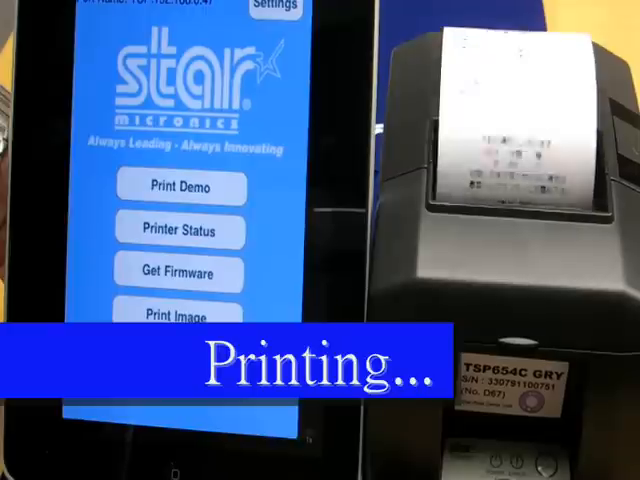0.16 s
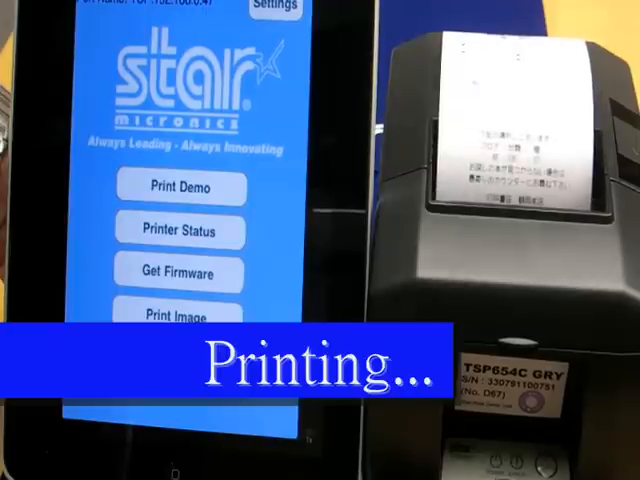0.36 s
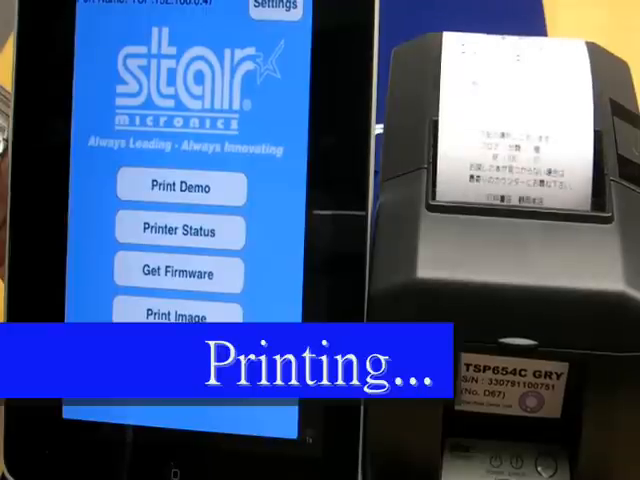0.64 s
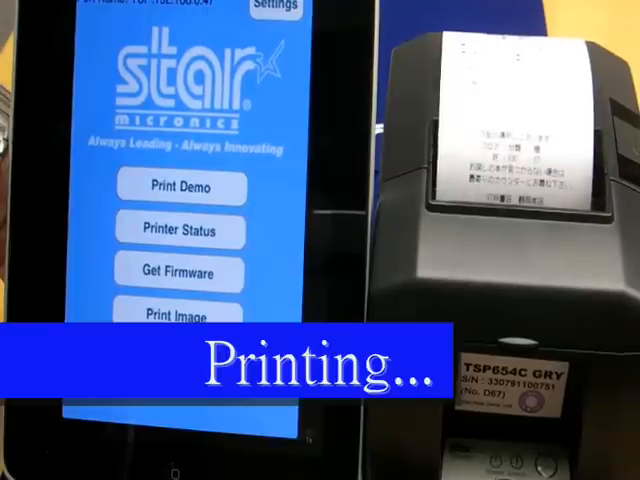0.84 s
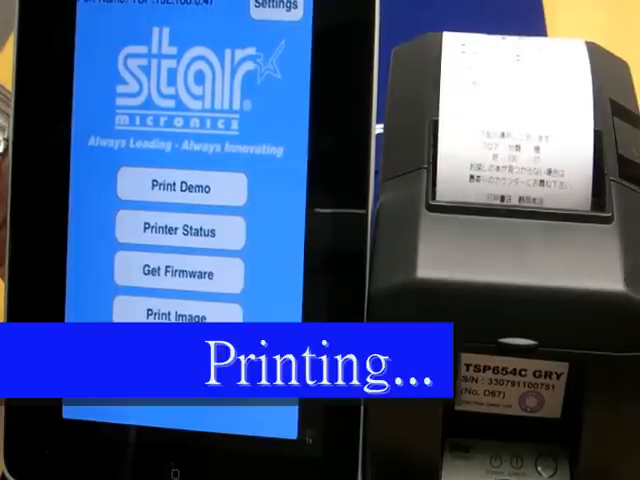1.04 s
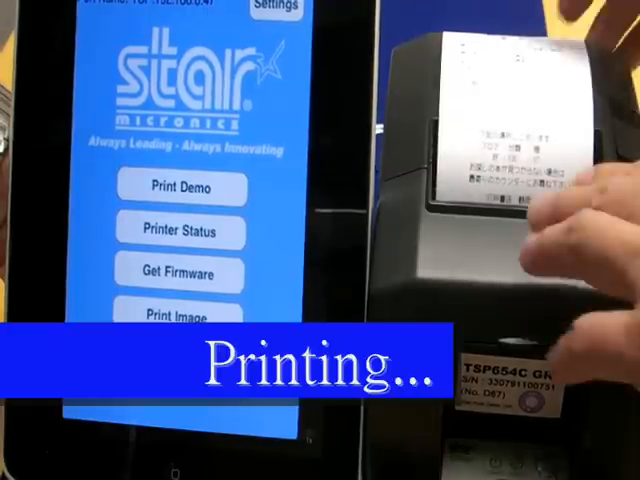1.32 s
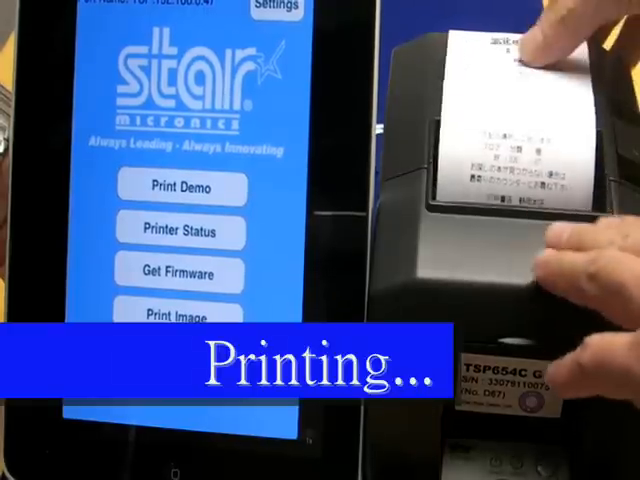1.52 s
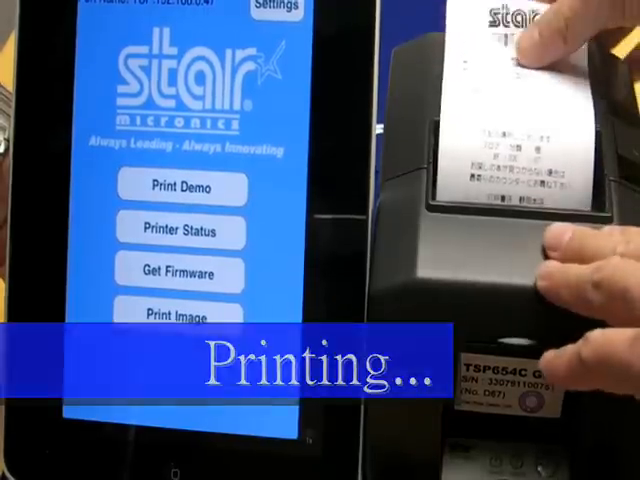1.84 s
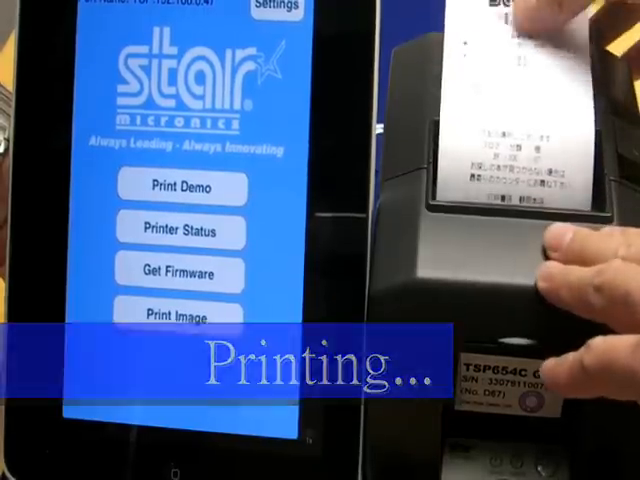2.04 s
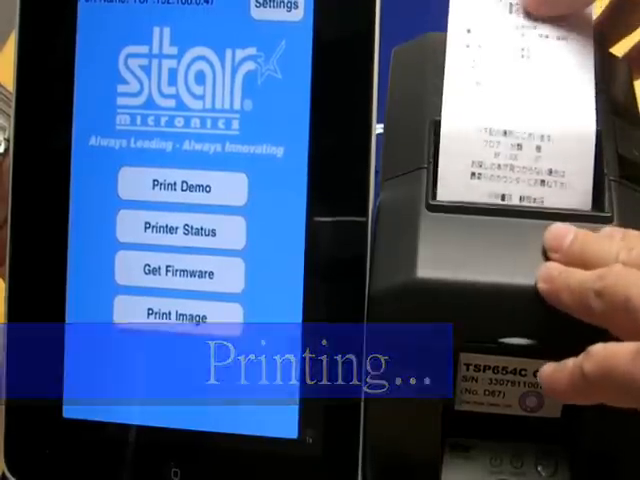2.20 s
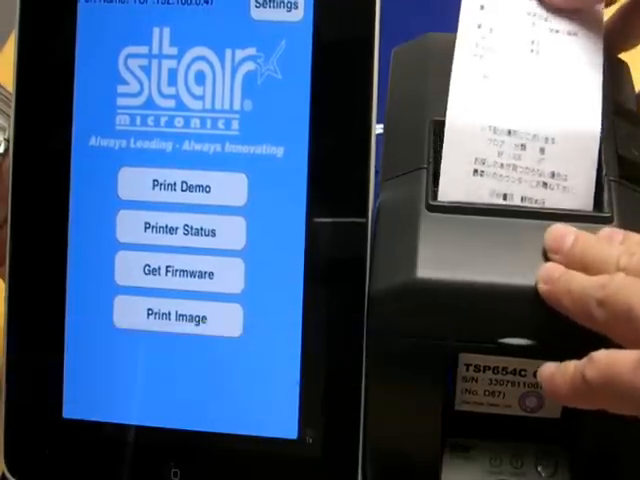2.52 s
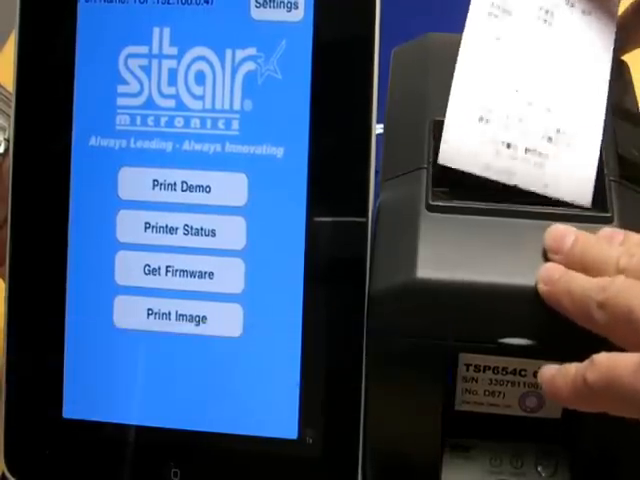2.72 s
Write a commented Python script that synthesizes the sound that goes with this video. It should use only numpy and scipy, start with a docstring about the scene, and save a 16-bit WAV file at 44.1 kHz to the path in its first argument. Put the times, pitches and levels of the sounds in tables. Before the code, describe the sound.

A receipt printer close by whines, rattles and clacks for under half a second; cloth swishes softly, paper crinkles and slides, then tears off with a loud sharp snap in a small quiet room with ventilation.

```python
"""A small receipt printer, close by, ends its job: the motor whines, gears rattle and the cutter clacks.
A sleeve swishes as hands reach in and take the slip; it slides, crinkles and snaps off its last tab.
Ventilation drones throughout in a small quiet room. Struck parts are sums of damped modes, rattle and
paper are dense random clicks through filters, cloth and air are filtered noise, and the whine is a
harmonic series; decaying noise gives the echoes of desk and room."""
import sys
import numpy as np
from scipy import signal
from scipy.fft import rfft, irfft
from scipy.io import wavfile
from scipy.ndimage import uniform_filter1d

SR = 44100
rng = np.random.default_rng(int(sys.argv[2]) if len(sys.argv) > 2 else 0)


def wav_record(signal):
    """Record a signal, one row per channel, as 16-bit PCM in the file named by sys.argv[1]."""
    frames = np.transpose(np.atleast_2d(signal))
    bounded = np.clip(frames, -1, 1)
    # unit amplitude maps onto the largest positive 16-bit level
    quanta = np.round(bounded * 32767).astype(np.int16)
    wavfile.write(sys.argv[1], SR, quanta)


N = 126126  # samples
T = np.arange(N) / SR  # seconds

# Spectrum of the low rumble of air. Each row: frequency in Hz, level in dB.
AIR_SPECTRUM = [(25, -14), (50, -4.5), (85, -4.5), (130, -5), (200, 5), (270, -5), (350, -5.5),
                (500, -16.5), (800, -25), (1500, -42.5), (4000, -43), (15000, -48)]
# Duct resonances. Each row: frequency in Hz, width at half amplitude in Hz, level in dB.
DUCT_RESONANCES = [(157.1, 6.7, -43.5), (201.3, 13.5, -42.5), (244.2, 13, -47), (441.8, 14, -60)]
RUMBLE_DB, HISS_DB = -42, -53.5

# Swish of the sleeve. Each row: time in seconds, level in dB.
REACH_LEVEL = [(.62, -72), (.75, -56.5), (.87, -49), (.96, -46), (1.2, -46), (1.42, -48.5), (1.53, -53),
               (1.63, -63)]
# Spectrum of sliding cloth. Each row: frequency in Hz, level in dB.
CLOTH_SPECTRUM = [(400, -3.5), (800, 1), (1800, 0), (4000, -2), (8000, -4), (13000, -4), (16000, -8.5)]

# Sliding of the paper. Each row: time in seconds, level in dB.
SLIDE_LEVEL = [(1.6, -68), (1.69, -46), (1.76, -54), (1.81, -51.5), (1.85, -62.5), (1.96, -60), (2.03, -45),
               (2.1, -40.5), (2.14, -47), (2.2, -38.5), (2.24, -46.5), (2.275, -67), (2.41, -55.5),
               (2.48, -59.5), (2.58, -51.5), (2.66, -50), (2.7, -32.5), (2.77, -41), (2.86, -52)]
# Spectrum of sliding paper. Each row: frequency in Hz, level in dB.
PAPER_SPECTRUM = [(500, -12), (1200, -6), (1800, -2.5), (3500, 0), (6000, -1.5), (11000, -1), (14000, -7.5),
                  (16000, -17)]
# Crinkles and finger taps. Each row: start in seconds, level in dB, 60 dB decay in seconds,
# brightness in dB per octave.
CRINKLE_EVENTS = [(0.906, -32, 0.076, -2.5), (.912, -35.5, 0.032, -5), (.924, -39.5, 0.073, 0.5),
                  (1.648, -42.5, .06, -0.5), (1.708, -41, 0.027, 0.5), (1.901, -44, 0.044, -0.5),
                  (2.0719, -23, 0.03, 0.5), (2.078, -24, 0.031, .5), (2.42, -49, .02, 14),
                  (2.6912, -24, .018, -0.5)]
# Spectrum of a crinkle before its tilt. Each row: frequency in Hz, level in dB.
CRINKLE_SPECTRUM = [(400, -15.5), (600, -3), (1100, -3.5), (2200, -0.5), (4200, -2.5), (7000, 0),
                    (12000, -3.5), (16000, -27)]
# Sheet modes rung by a juddering fingertip. Each row: frequency in Hz, level in dB, 60 dB decay in seconds.
CREAK_MODES = [(1027, -1, 0.03), (1180, -10.5, .025), (1580, -2, .02), (1750, -1.5, 0.019),
               (2570, -4.5, 0.015), (3970, -1, .016), (4570, -6.5, .012), (6110, -8, .012)]
CREAK_S, CREAK_T60_S, CREAK_DB = 2.0002, 0.064, -30.5
# Faint squeak of skin on paper. Each row: time in seconds, mean pitch in Hz, level in dB.
SQUEAK_TRACK = [(1.96, 1040, -61), (2.0, 1022, -46), (2.022, 1056, -43), (2.045, 1085, -53),
                (2.066, 1180, -49), (2.075, 1200, -65)]
# Finger taps: short dull thumps on the cover. Each row: start in seconds, peak level in dB.
FINGER_TAPS = [(.906, -35), (2.0725, -32.5)]
# Modes of the cover. Each row: frequency in Hz, level in dB, 60 dB decay in seconds.
COVER_MODES = [(582, 1.5, .07), (910, -5, .04), (1520, -5, .025), (2140, -7, 0.016)]

# Snaps of the taut sheet. Each row: start in seconds, peak level in dB, brightness in dB per octave.
SHEET_SNAPS = [(2.6395, -26, -13), (2.691, -20, -7), (2.7265, 1, 7)]
# Modes of the paper sheet. Each row: frequency in Hz, level in dB, 60 dB decay in seconds.
SHEET_MODES = [(2050, -24, .012), (2690, 6.5, .01), (3620, -21, .008), (3870, 18, 0.0083), (5160, 1, .005),
               (6200, 0, 0.0062), (9250, 5, .003), (13600, -9, .002)]
# Runs of tearing fibres. Each row: peak in seconds, level in dB, rise time constant in seconds,
# 60 dB decay in seconds.
FIBRE_RUNS = [(2.7266, -15, 0.00061, 0.012), (2.7326, -11.5, 0.002, 0.022), (2.715, -41, 0.022, 0.092),
              (2.742, -38, .004, 0.08)]
# Spectrum of tearing fibres. Each row: frequency in Hz, level in dB.
FIBRE_SPECTRUM = [(300, -8.5), (700, -18), (1300, -19), (2100, -8), (3100, -6.5), (3800, -6.5), (4700, -6),
                  (6500, -7), (9000, -13.5), (12500, -20), (16000, -28)]

# Drive of the mechanism. Each row: time in seconds, gear rattle level in dB, motor level in dB.
DRIVE_LEVELS = [(0, -32.5, -36), (.03, -37.5, -43), (.08, -35, -38), (.11, -28.5, -28), (.13, -21, -25.5),
                (.16, -26, -40), (.18, -23.5, -35), (.205, -32, -39), (.24, -25.5, -37), (.255, -24, -51),
                (.283, -26.5, -52), (.3, -31.5, -32), (.325, -34, -32), (.35, -41.5, -38), (.39, -47, -44),
                (.435, -41, -62), (.48, -64, -78)]
# Motor speed. Each row: time in seconds, mean whine frequency in Hz.
MOTOR_SPEED = [(0, 444.3), (.08, 454), (.13, 477), (.2, 471.2), (.27, 461.7), (.33, 472), (.45, 460)]
# Harmonics of the whine. Each row: multiple of the whine frequency, relative level in dB.
WHINE_HARMONICS = [(1, 5), (2, -11.5), (4, -19), (5, -24)]
# Spectrum of the chassis whirr. Each row: frequency in Hz, level in dB.
CHASSIS_SPECTRUM = [(230, -8.5), (340, -0.5), (560, -1.5), (760, -6), (1000, -4), (1300, -14.5),
                    (3000, -31)]
# Spectrum of the gear rattle. Each row: frequency in Hz, level in dB.
GEAR_SPECTRUM = [(250, -14.5), (340, -5), (560, -6.5), (720, -13.5), (960, -12), (1250, -17.5),
                 (1950, -9.5), (2450, -14), (2950, -13), (3650, -9.5), (5200, -13), (9000, -12),
                 (13000, -16), (16000, -28.5)]
# Modes of the plastic case. Each row: frequency in Hz, level in dB, 60 dB decay in seconds.
CASE_MODES = [(1940, -14, .03), (2055, 11.5, 0.01), (2560, 6.5, 0.012), (3700, 6, 0.009), (4400, -21, .008),
              (6800, -16, .006)]
# Cutter and latch clacks. Each row: start in seconds, ring level in dB, scrape level in dB,
# 60 dB decay of the scrape in seconds, brightness of the ring in dB per octave.
CUTTER_CLACKS = [(.015, -9, -15, 0.017, -7.5), (.0947, -28, -20, .04, 7), (.1201, -15, -13, 0.016, 21),
                 (.1305, -10, -22, .015, 21), (.254, -24, -16, .015, -17), (0.288, -6.5, -12, 0.013, 11),
                 (.4058, -33, -25, 0.026, -0.5), (.423, -46, -38, 0.014, 2)]
# Spectrum of a scrape before its tilt. Each row: frequency in Hz, level in dB.
SCRAPE_SPECTRUM = [(500, -23.5), (1300, -19), (2200, 1), (4000, -0.5), (8000, 0), (12000, -6), (16000, -23)]

# Left, shaded microphone against the right. Each row: frequency in Hz, level difference in dB.
LEFT_SHADE = [(100, -3), (400, -1.5), (1000, -2.2), (2000, 0), (4000, 0), (8000, -8.5), (14000, -9)]
LEFT_LAG = 2  # samples
SHARED_BELOW_HZ = 1110  # echoes are alike at both microphones below this
ROOM_T60_S, ROOM_DB, DESK_T60_S, DESK_DB = 0.26, -14, 0.058, -8
TOP_HZ = 16000  # upper band edge of the recorder


def amp(db):
    """Amplitude ratio: twenty decibels are a factor of ten."""
    return 10 ** (np.asarray(db) / 20)


def unit(x):
    """Normalisation to a root-mean-square of 1."""
    return x / np.sqrt(np.mean(x ** 2))


def fader(table, axis=1):
    """Envelope linear in dB: it holds its first level for 0.03 s before the table, and is silent outside."""
    rows = np.array(table)
    level_db = np.interp(T, rows[:, 0], rows[:, axis], right=-np.inf)
    return amp(level_db) * (T >= rows[0, 0] - .03)


def colour(x, points, tilt=0):
    """Minimum-phase filtering through (Hz, dB) points plus a tilt in dB per octave; keeps white-noise power."""
    hz, db = np.array(points).T
    octave = np.log2(np.maximum(np.fft.rfftfreq(4096, 1 / SR), 5))
    gain_db = np.interp(octave, np.log2(hz), db + tilt * np.log2(hz))
    gain_db -= 12 * np.maximum(np.log2(hz[0]) - octave, 0)  # 12 dB per octave below the first point
    # folding the cepstrum onto positive time makes the response causal
    cepstrum = irfft(np.log(amp(gain_db)))
    half = len(cepstrum) // 2
    folded = 2 * cepstrum[:half] * (np.arange(half) > 0)
    response = irfft(np.exp(rfft(folded, len(cepstrum))))
    return signal.fftconvolve(x, response / np.linalg.norm(response))[:N]


def ring(modes, start=0, tilt=0):
    """Modal superposition: one blow excites damped sines, neighbours in opposite sense; peak 1."""
    t = T[:SR // 4]
    y = np.zeros(len(t))
    for k, (hz, db, t60) in enumerate(modes):
        decay = amp(-60 * t / t60)
        y += (-1) ** k * amp(db + tilt * np.log2(hz)) * decay * np.sin(2 * np.pi * hz * t)
    return np.concatenate([np.zeros(int(start * SR)), y / np.abs(y).max(), np.zeros(N)])[:N]


def burst(start, t60, rise=0.00023):
    """Exponential growth to a peak of 1 at the start time, then exponential decay by 60 dB in t60."""
    since = T - start
    return np.exp(np.minimum(since / rise, -np.log(1000) * since / t60))


def grains(rate, spread_db):
    """Shot noise: random clicks, rate per second on average, of either sign and uneven size; rms 1."""
    present = rng.random(N) < rate / SR
    sign = rng.choice([-1, 1], N)
    size = amp(spread_db * np.clip(rng.standard_normal(N), -2, 2))
    return unit(present * sign * size)


def walk(rate):
    """Smoothed random fluctuation, rate independent values per second; rms 1."""
    k = int(SR / rate)
    steps = np.repeat(rng.standard_normal(N // k + 1), k)
    return unit(uniform_filter1d(steps, k)[:N])


def microphones(x):
    """Arrival and shading differences: a source to the right reaches the left later and duller."""
    hz, db = np.array(LEFT_SHADE).T
    grid = np.log(np.fft.rfftfreq(2 * N, 1 / SR) + 1)
    shade = amp(np.interp(grid, np.log(hz), db))
    left = irfft(rfft(x, 2 * N) * shade)[:N]
    return np.array([np.pad(left, (LEFT_LAG, 0))[:N], x])


def wide(make, share, pan_db):
    """Partial coherence: a power share differs between microphones, pan_db louder at the left; the rest is common."""
    share = np.clip(share, 0, 1)
    common = microphones(make())
    separate = np.array([make(), make()]) * amp([[pan_db / 2], [-pan_db / 2]])
    return np.sqrt(1 - share) * common + np.sqrt(share) * separate


def reflections(x, t60, delay_s, treble_db):
    """Diffuse reverberation: decaying noise stands for echoes, incoherent between microphones in the treble."""
    low, high = (signal.butter(2, SHARED_BELOW_HZ, kind, fs=SR, output="sos") for kind in ("low", "high"))
    shared = signal.sosfilt(low, rng.standard_normal(N))
    spray = shared + signal.sosfilt(high, rng.standard_normal((2, N)))
    spectrum = [(100, 0.044), (3000, -0.99), (14000, treble_db)]
    tails = [colour(side * burst(delay_s, t60), spectrum) for side in spray]
    # the right, unshaded signal feeds the echoes of both sides
    return np.array([signal.fftconvolve(x[1], h / np.linalg.norm(h))[:N] for h in tails])


def ventilation():
    """Resonance selects narrow bands of noise in a duct, over a low rumble of air and a thin even hiss."""
    hz = np.fft.rfftfreq(N, 1 / SR)
    drone = np.zeros(N)
    for centre, width, db in DUCT_RESONANCES:
        random_phase = np.exp(2j * np.pi * rng.random(len(hz)))
        resonance = 1 / (1 + (2 * (hz - centre) / width) ** 2)
        drone += amp(db) * unit(irfft(random_phase * resonance, N))
    rumble = wide(lambda: colour(rng.standard_normal(N), AIR_SPECTRUM), share=0.11, pan_db=1)
    hiss_spectrum = [(300, 5.5), (1500, 4.5), (5000, 0), (15000, -.5)]
    hiss = np.array([colour(rng.standard_normal(N), hiss_spectrum) for _ in range(2)])
    return microphones(drone) + amp(RUMBLE_DB) * rumble + amp(HISS_DB) * hiss


def sleeve():
    """Friction of cloth is smooth broadband noise, swelling and fading as the arms reach in."""
    cloth = wide(lambda: colour(rng.standard_normal(N), CLOTH_SPECTRUM), share=0.78, pan_db=-0.2)
    return cloth * fader(REACH_LEVEL) * amp(.5 * walk(19.7))


def slide():
    """Friction of paper is a dense train of uneven contacts, hence grainy noise."""
    paper = wide(lambda: colour(grains(9000, spread_db=7), PAPER_SPECTRUM), share=0.65, pan_db=-3.5)
    return paper * fader(SLIDE_LEVEL) * amp(1.0 * walk(49.47))


def crinkles():
    """Transient excitation: buckling paper and tapping fingers give short decaying bursts of uneven clicks."""
    return sum(amp(db) * colour(burst(s, t60) * grains(8000, spread_db=8), CRINKLE_SPECTRUM, tilt)
               for s, db, t60, tilt in CRINKLE_EVENTS)


def creak():
    """Forced resonance: a juddering fingertip feeds a burst of clicks to the modes of the sheet."""
    judder = burst(CREAK_S, CREAK_T60_S, rise=0.0017) * grains(4000, spread_db=3.5)
    body = ring(CREAK_MODES)
    return amp(CREAK_DB) * signal.fftconvolve(judder, body / np.linalg.norm(body))[:N]


def squeak():
    """Frequency modulation: the sine of skin on paper glides, with a fast random jitter of pitch."""
    times, hz, _ = np.array(SQUEAK_TRACK).T
    pitch = np.interp(T, times, hz) * (1 + 0.0396 * walk(400))
    return np.sin(2 * np.pi * np.cumsum(pitch) / SR) * fader(SQUEAK_TRACK, axis=2)


def handling():
    """Superposition of friction and impact: the slip slides, crinkles, creaks and squeaks, and a finger taps the cover."""
    taps = sum(amp(db) * ring(COVER_MODES, s) for s, db in FINGER_TAPS)
    return slide() + microphones(crinkles() + creak() + squeak() + taps)


def tear():
    """Sudden release of tension rings the taut sheet; the remaining fibres rip in quick runs of clicks."""
    runs = sum(amp(db) * burst(s, t60, rise) for s, db, rise, t60 in FIBRE_RUNS)
    fibres = runs * grains(12000, spread_db=0.0)
    snaps = sum(amp(db) * ring(SHEET_MODES, s, tilt) for s, db, tilt in SHEET_SNAPS)
    return microphones(snaps + colour(fibres, FIBRE_SPECTRUM))


def motor(phase):
    """Periodic drive yields a harmonic whine; the shaken chassis adds a noisy whirr."""
    whine = unit(sum(amp(db) * np.sin(k * phase) for k, db in WHINE_HARMONICS)) * amp(2.1 * walk(69.6))
    whirr = colour(grains(2500, spread_db=3), CHASSIS_SPECTRUM)
    return (amp(-3) * whine + amp(-4.5) * whirr) * fader(DRIVE_LEVELS, axis=2)


def gears(phase):
    """Amplitude modulation: the teeth rattle once a motor step, while sparse ticks excite the case modes."""
    teeth = unit((1 + .3 * np.cos(phase)) * amp(1.9 * walk(150)))
    rattle = wide(lambda: colour(teeth * grains(7000, spread_db=3), GEAR_SPECTRUM), share=.5, pan_db=-2)
    ticks = unit(signal.fftconvolve(grains(260, spread_db=3.5), ring(CASE_MODES))[:N])
    return (rattle + microphones(amp(-10) * ticks)) * fader(DRIVE_LEVELS)


def cutter():
    """Impact excitation: each clack rings the case modes and adds a decaying scrape."""
    clacks = np.zeros(N)
    for s, ring_db, scrape_db, t60, tilt in CUTTER_CLACKS:
        scrape = colour(burst(s, t60) * grains(22000, spread_db=4.5), SCRAPE_SPECTRUM, tilt / 2)
        clacks += amp(ring_db) * ring(CASE_MODES, s, tilt) + amp(scrape_db) * scrape
    return clacks


def printer():
    """Coupled mechanism: one unsteady motor phase governs whine and gear teeth; the cutter knocks the case."""
    speed_hz = np.interp(T, *np.array(MOTOR_SPEED).T) * (1 + .022 * walk(90.5))
    phase = 2 * np.pi * np.cumsum(speed_hz) / SR
    return gears(phase) + microphones(motor(phase) + cutter())


def scene():
    """Superposition of direct sound, early desk echoes, later room echoes and background."""
    near = printer() + handling() + tear()
    desk = amp(DESK_DB) * reflections(near, DESK_T60_S, delay_s=0.00188, treble_db=1.5)
    room = amp(ROOM_DB) * reflections(near, ROOM_T60_S, delay_s=0.00985, treble_db=-5.5)
    return near + desk + room + sleeve() + ventilation()


def record(dry):
    """Saturation and band limiting: the recorder clips at full scale, then cuts the top."""
    low_pass = signal.ellip(10, .2, 80, TOP_HZ, fs=SR, output="sos")
    return signal.sosfilt(low_pass, np.clip(dry, -1, 1))


dry = scene()
out = record(dry)
wav_record(out)
```